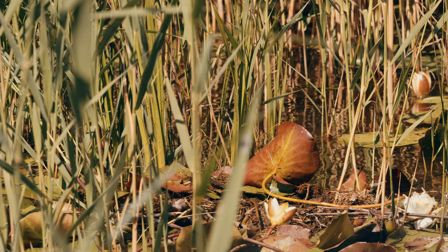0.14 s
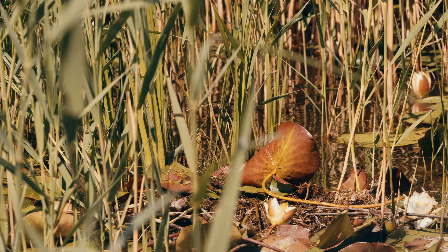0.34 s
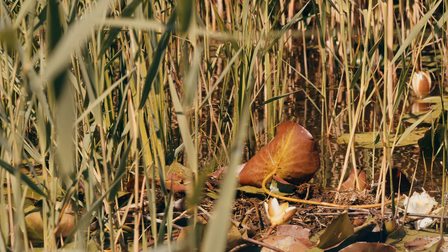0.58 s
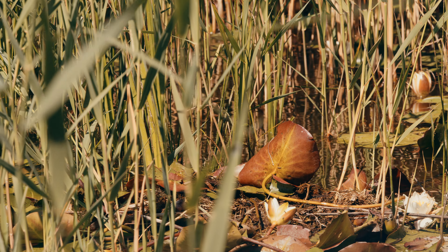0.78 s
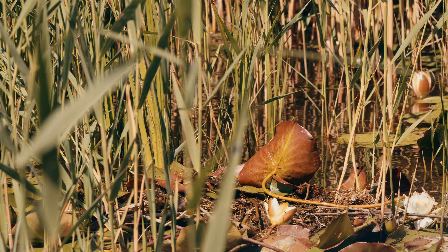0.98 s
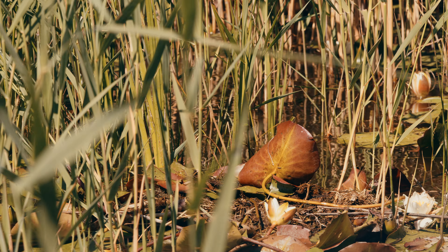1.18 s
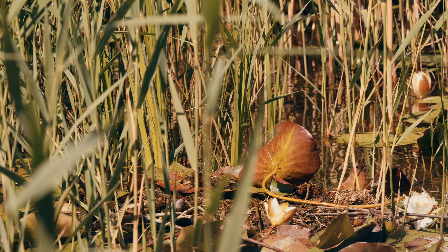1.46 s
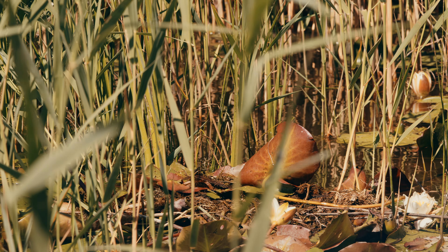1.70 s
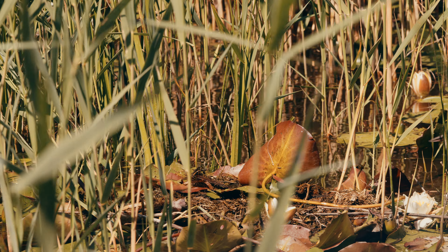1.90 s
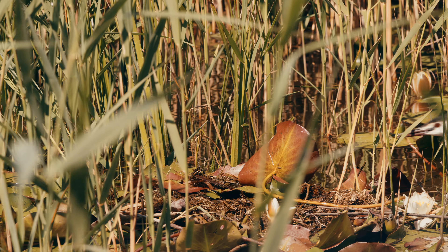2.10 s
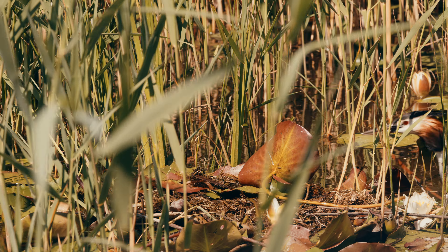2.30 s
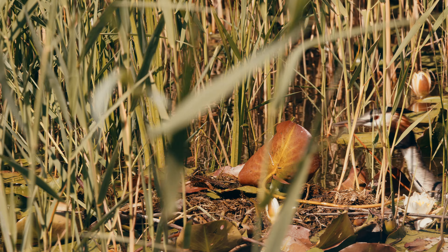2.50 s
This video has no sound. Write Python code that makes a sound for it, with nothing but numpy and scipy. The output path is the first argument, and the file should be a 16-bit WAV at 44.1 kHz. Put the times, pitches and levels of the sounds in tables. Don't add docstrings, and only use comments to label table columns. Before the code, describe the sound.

A waterbird gives three short nasal honks close on the right, with croaky rasps in a marsh

```python
import sys
import numpy as np
from scipy import signal
from scipy.fft import rfft, irfft, next_fast_len
from scipy.io import wavfile
from scipy.ndimage import uniform_filter1d, map_coordinates

SR = 44100
rng = np.random.default_rng(int(sys.argv[2]) if len(sys.argv) > 2 else 0)


def magnitude_from_level(level_db):
    exponent = np.asarray(level_db, float) / 20
    return 10 ** exponent


def inscribe(sig):
    pcm = np.round(np.clip(np.atleast_2d(sig).T, -1, 1) * 32767)
    wavfile.write(sys.argv[1], SR, pcm.astype(np.int16))


N = 116865

# pitch_hz, level_db (per Hz)
HISS_SPECTRUM = [(53, -45), (90, -10), (229, -11.5), (266, -11.5), (310, -8), (915, -4), (2530, -13),
                 (4360, -13.5), (16000, -25.5)]
RUMBLE_SPECTRUM = [(8.8, -24), (15, 6), (38, -5.5), (70, -1.5), (100, -10.5), (130, -28), (220, -120)]
# pitch_hz, correlation (-1 to 1)
MICROPHONE_LIKENESS = [(40, -0.11), (130, 0.39), (300, 0.47), (640, 0.05), (1400, 0.37), (3100, -0.29),
                       (15000, -0.27)]
# pitch_hz, t60_s
REED_DECAY = [(500, 0.96), (2000, 0.57), (5000, 0.47), (12000, 0.36)]
# delay_s, left_db, right_db
WHISTLE_ECHOES = [(.077, -3, -14)]
HONK_ECHOES = [(.077, -11, -19), (0.0554, -14, -16.5)]
# start_s, length_s, first_hz, last_hz, level_db
FAR_PIPES = [
    (.01, 0.083, 4440, 4570, -59),
    (.66, 0.038, 3450, 3650, -58),
    (.893, 0.038, 3400, 3600, -57),
    (1.385, 0.037, 1286, 1153, -44.5),
    (1.64, 0.049, 1140, 1274, -43.5),
    (1.81, 0.087, 1167, 1234, -46),
    (2.425, 0.041, 1230, 1370, -45.5),
    (2.465, 0.042, 4300, 4100, -53.5),
    (2.575, 0.032, 4350, 4040, -54),
]
# start_s, peak_db, ring_hz, t60_s
TWIG_TICKS = [
    (1.427, -22, 3500, .016),
    (1.3, -31, 6900, 0.0089),
    (1.539, -16.5, 5100, 0.014),
    (2.128, -29, 7200, 0.0081),
    (1.3, -27.5, 5040, .008),
]
# start_s, length_s, first_hz, last_hz, level_db
BUBBLE_PLOPS = [
    (.336, .01, 950, 1050, -36),
    (.364, .012, 900, 1450, -31),
    (.711, .015, 1150, 800, -36),
    (.934, .012, 1000, 880, -35),
    (2.124, .009, 950, 850, -39),
]
# start_s, length_s, first_hz, last_hz, level_db
LOW_CALL = (.382, .047, 880, 630, -31)
LOW_CALL_OVERTONES = [-1, -2, -17]
# loudest_pulse_s, half_length_s, level_db, pulses_per_s, top_band_db
CROAKS = [
    (0.689, 0.034, -42, 83, -5),
    (0.936, 0.033, -31.5, 96, 0.5),
    (1.247, 0.046, -28, 102, 1),
    (1.481, 0.04, -26, 96, -2),
    (1.784, 0.046, -26, 101, 0),
    (2.112, 0.031, -31.5, 110, -3),
    (2.173, 0.032, -35, 58, -21),
    (2.346, 0.032, -26, 99, 3.5),
]
# pitch_hz, width_hz, level_db, delay_ms, gain_db (over half a croak)
THROAT_BANDS = [(1483, 297, -9, -1.1, 0.5), (1896, 268, -7.5, 0.21, 0.5), (2343, 290, -9, 0.093, 1),
                (2891, 214, -10.5, 0.98, -1), (3600, 440, -20, 1.9, 1.5), (4610, 400, -25.5, 0.54, 5.5),
                (5230, 570, -23.5, -0.34, -2), (6080, 990, -21.5, 1.5, -0.5)]
# start_s, length_s, pitch_hz, level_db
WHISTLES = [
    (.2, 0.012, 4978, -16.5),
    (1.627, 0.015, 5022, -15),
]
WHISTLE_OVERTONES = [0.5, -15.5, -21]
# start_s, length_s, top_pitch_hz, level_db, softness (0-1)
HONKS = [
    (0.206, 0.061, 879.3, -17, 0.73),
    (1.017, 0.058, 876.2, -18.5, 0),
    (1.88, 0.0511, 847.4, -20.5, 1),
]
HARD_HONK_OVERTONES = [-11, -0.5, -6, -10.5, -16, -24, -24.5, -30, -26, -33, -36, -46]
SOFT_HONK_OVERTONES = [-9, -1, -11, -17, -21, -27.5, -34.5, -31, -27, -37, -38, -48]
# pitch_hz, level_db
MICROPHONE_TOP = [(100, 0), (15700, 0), (16100, -22), (16600, -30), (17000, -60)]


def unit(x):
    return x / np.sqrt(np.mean(x ** 2) + 1e-20)


def along(points, hz):
    f, v = np.transpose(points)
    return np.interp(np.log(hz + 1), np.log(f + 1), v)


def wobble(rate, size):
    knots = rng.standard_normal(int(size * 400 / SR) + 9)
    return map_coordinates(knots, [np.arange(size) * rate / SR])


def filtered(x, response):
    m = next_fast_len(N + SR // 4)
    return irfft(rfft(x, m) * response(np.fft.rfftfreq(m, 1 / SR)), m)[..., :N]


def add(track, s, x):
    i = max(round(s * SR), 0)
    track[i:i + len(x)] += x[:N - i]


def gate(t, length, attack, release):
    ramp = np.minimum(t / attack, (length - t) / release)
    return np.sin(np.pi / 2 * np.clip(ramp, 0, 1)) ** 2


def voice(hz, levels_db):
    turn = 2 * np.pi * np.cumsum(hz) / SR
    bill_twist = 0.583
    total = sum(magnitude_from_level(db) * np.cos((k + 1) * turn - bill_twist * k * k) for k, db in enumerate(levels_db))
    return -total * np.sqrt(2)


def gliding_notes(rows, levels_db, rough_db):
    out, t = np.zeros(N), np.arange(SR // 8) / SR
    for s, length, first_hz, last_hz, db in rows:
        slide = first_hz + (last_hz - first_hz) * np.clip(t / length, 0, 1)
        hz = slide + 8 * rough_db * wobble(123.7, len(t))
        level = magnitude_from_level(db + rough_db * wobble(153, len(t)))
        add(out, s, level * gate(t, length, 0.25 * length, 0.52 * length) * voice(hz, levels_db))
    return out


def placed(x, lag, pan_db):
    side = np.array([[1], [-1]])
    return filtered(x, lambda hz: magnitude_from_level(side * pan_db / 2) * np.exp(-1j * np.pi * hz * side * lag / SR))


def marsh(x, echoes, scatter_db=0):
    reeds_db, swell_s, pan_db = -7, 0.0067, 0.5
    hz, t, z = signal.stft(rng.standard_normal((2, SR)), SR, nperseg=256)
    decay = magnitude_from_level(-60 * t / along(REED_DECAY, hz)[:, None])
    tail = signal.istft(z * decay * (1 - np.exp(-t / swell_s)), SR, nperseg=256)[1]
    level = magnitude_from_level(reeds_db + scatter_db + pan_db * np.array([[1], [-1]]))
    tail = tail / np.linalg.norm(tail[0]) * level
    for s, left_db, right_db in echoes:
        tail[:, round(s * SR)] += magnitude_from_level(np.array([left_db, right_db])) * [1, -1]
    return signal.fftconvolve(x[None], tail, axes=1)[:, :N]


def rush(spectrum, patchy_db):
    z = signal.stft(rng.standard_normal((2, N)), nperseg=512)[2]
    field = uniform_filter1d(rng.standard_normal(z.shape[1:]), 5, 0)
    field = uniform_filter1d(field, 10, 1)
    pair = signal.istft(z * magnitude_from_level(patchy_db * unit(field)), nperseg=512)[1][:, :N]

    def mid_side(hz):
        turn = np.arccos(np.clip(along(MICROPHONE_LIKENESS, hz), -1, 1)) / 2
        return magnitude_from_level(along([(5, -120)] + list(spectrum), hz)) * [np.cos(turn), np.sin(turn)]

    mid, side = filtered(pair, mid_side)
    return np.array([mid + side, mid - side]) / np.sqrt(np.mean(mid ** 2))


def distant_hum():
    turn = 2 * np.pi * np.cumsum(69.2 + 1.5 * wobble(6.05, N)) / SR
    return magnitude_from_level(-56 + 2.2 * wobble(6.93, N)) * np.sin(turn + np.array([[0.54], [-0.54]]))


def air():
    hiss = magnitude_from_level(-48) * rush(HISS_SPECTRUM, patchy_db=1.9)
    rumble = magnitude_from_level(-57) * rush(RUMBLE_SPECTRUM, patchy_db=-0.4)
    return hiss + rumble + distant_hum()


def far_birds():
    return gliding_notes(FAR_PIPES, [0], rough_db=4.5)


def twigs():
    out, t = np.zeros(N), np.arange(SR // 20) / SR
    band = signal.butter(2, [3000, 9500], 'band', fs=SR)
    for s, db, hz, t60 in TWIG_TICKS:
        crack = signal.lfilter(*band, rng.standard_normal(len(t))) * magnitude_from_level(-7 - 60 * t / 0.0082)
        ring = magnitude_from_level(-60 * t / t60) * np.sin(2 * np.pi * hz * t) * (1 - np.exp(-t / 0.0001))
        add(out, s, magnitude_from_level(db) * (crack + ring))
    return out


def water_in_front():
    plops = gliding_notes(BUBBLE_PLOPS, [0, -22], rough_db=3.5)
    return plops + gliding_notes([LOW_CALL], LOW_CALL_OVERTONES, rough_db=5.0)


def frogs():
    burst_ms, jitter_ms, scatter_db, spiky_db, leak = 2.1, 0.7, 2.5, 4, 0.16
    out, t = np.zeros(N), np.arange(-SR // 10, SR // 10) / SR
    for s, half, db, rate, top_db in CROAKS:
        luck = rng.standard_normal((13, 2))
        pulse_s = np.arange(-6, 7) / rate + jitter_ms * luck[:, 0] / 1000
        for hz, width, part_db, delay_ms, gain_db in THROAT_BANDS:
            since_ms = (t[:, None] - pulse_s) * 1000 - delay_ms
            pulses = magnitude_from_level(scatter_db * luck[:, 1]) * np.exp(-(since_ms / burst_ms) ** 2)
            bursts = leak + pulses.sum(axis=1)
            clicks = rng.standard_normal(len(t)) * magnitude_from_level(spiky_db * rng.standard_normal(len(t)))
            pole = np.exp((-np.pi * width * 1.9 + 2j * np.pi * hz) / SR)
            ring = unit(signal.lfilter([1], np.poly([pole] * 4), bursts * clicks).real)
            swell_db = gain_db * t / half - 11.1 * (t / half) ** 2
            add(out, s + t[0], magnitude_from_level(db + part_db + top_db * (hz > 4000) + swell_db) * ring)
    return out


def whistles():
    out, t = np.zeros(N), np.arange(SR // 8) / SR
    for s, length, hz, db in WHISTLES:
        note = voice(hz * (1 - 0.3 * (t - 0.008)), WHISTLE_OVERTONES)
        swell = magnitude_from_level(db + 130 * (t - 0.0659))
        add(out, s, swell * gate(t, length, 0.0058, 0.003) * note)
    return out


def honks():
    rise, sag, sag_power = 0.02, 0.08, 1.7
    sag_s, top_at = 0.057, 0.35
    closing_db, swell_db = 1, 2.5
    out, t = np.zeros(N), np.arange(SR // 8) / SR
    for s, length, top_hz, db, soft in HONKS:
        u = np.clip(t / sag_s, 0, 1)
        climb = rise * np.clip(1 - u / top_at, 0, 1) ** 2
        fall = sag * np.clip((u - top_at) / (1 - top_at), 0, 1) ** sag_power
        hz = top_hz * (1 - climb - fall + 0.0018 * wobble(83, len(t)))
        levels = []
        for k, (hard_db, soft_db) in enumerate(zip(HARD_HONK_OVERTONES, SOFT_HONK_OVERTONES)):
            blend = hard_db + np.clip(soft, 0, 1) * (soft_db - hard_db)
            closing = k * closing_db * (t / length) ** 3
            levels.append(blend - closing + 0.95 * wobble(94, len(t)))
        swell = magnitude_from_level(db - swell_db * (0.5 + soft) * (2 * t / length - 1) ** 2)
        add(out, s, swell * gate(t, length, 0.0058, 0.0089) * voice(hz, levels))
    return out


def scene():
    far, twig, front, frog, whistle, honk = far_birds(), twigs(), water_in_front(), frogs(), whistles(), honks()
    direct = placed(honk + frog + twig, 8.5, -4.5) + placed(whistle, 7.16, -7.5)
    direct += placed(front, -2.2, 1.0) + placed(far, 2.5, -1.9)
    answer = magnitude_from_level(0.5) * marsh(honk, HONK_ECHOES) + marsh(whistle, WHISTLE_ECHOES, scatter_db=-0.5)
    answer += marsh(magnitude_from_level(-4) * frog + magnitude_from_level(-5.5) * twig, [])
    answer += marsh(magnitude_from_level(-6) * front + 0.95 * far, [])
    return air() + direct + answer


def top_cut(x):
    return signal.sosfilt(signal.butter(12, 16980, fs=SR, output="sos"), x)


def record(dry):
    mix = filtered(dry, lambda hz: magnitude_from_level(along(MICROPHONE_TOP, hz)))
    return top_cut(mix)


dry = scene()
out = record(dry)
inscribe(out)
```